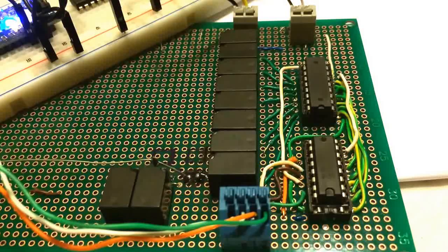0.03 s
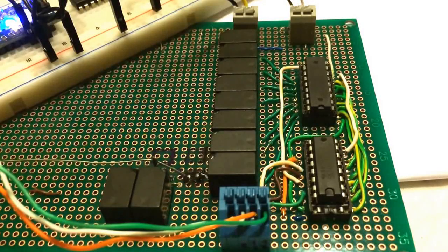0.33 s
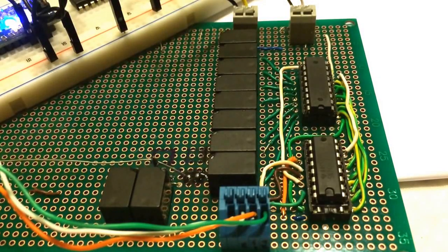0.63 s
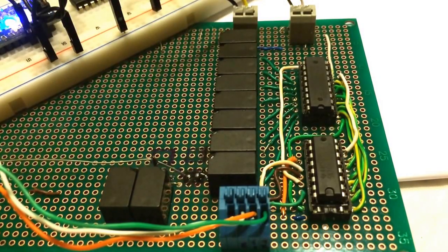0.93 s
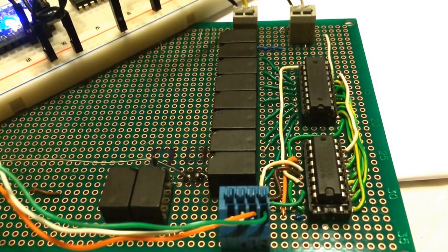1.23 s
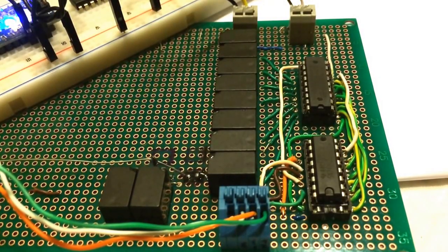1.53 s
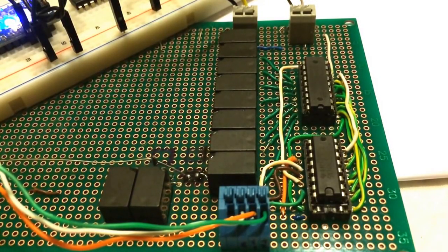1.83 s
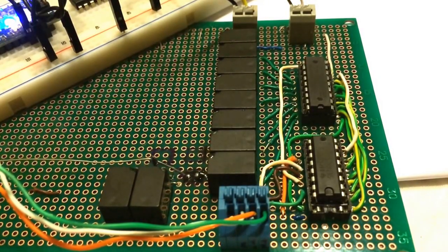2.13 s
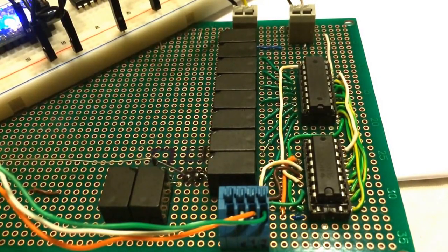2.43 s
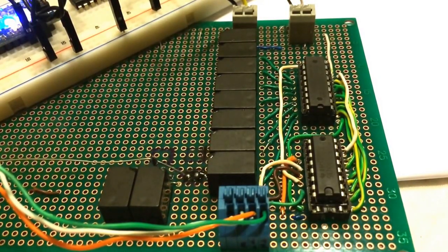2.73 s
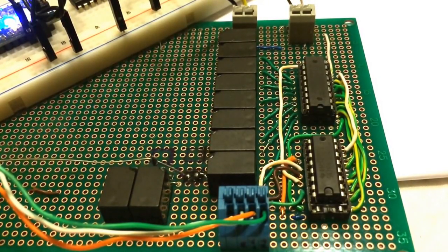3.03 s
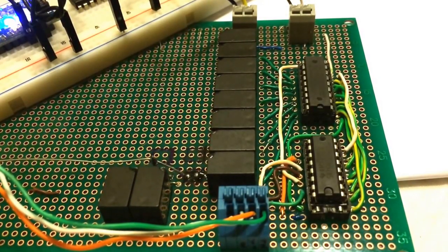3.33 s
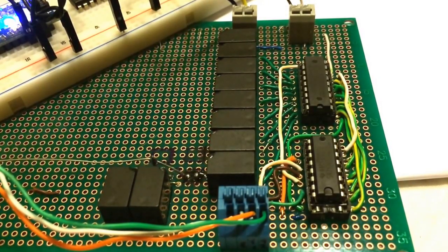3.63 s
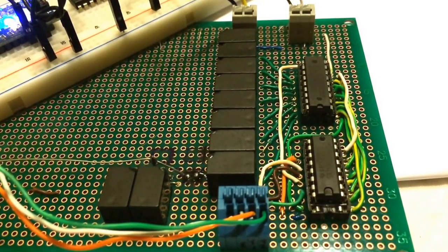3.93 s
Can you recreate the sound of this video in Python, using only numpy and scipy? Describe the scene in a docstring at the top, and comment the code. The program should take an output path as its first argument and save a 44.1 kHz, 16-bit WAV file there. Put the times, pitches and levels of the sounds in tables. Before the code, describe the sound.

A bank of small relays on a circuit board clicks rapidly and continuously, close to the microphone. Heavier clacks recur in a regular pattern within the bright chatter, like a tiny idling engine in a quiet small room.

```python
"""Relays counting in binary

Close to the microphone, seven small relays on a circuit board count at about fifty steps a second.
At each step any carrying relays drop out and rattle on their back stops; the next snaps in a few ms later.
The longer the carry, the heavier the clack and the more the board rings.
The desk reflects the clicks, and a quiet small room with a deep rumble lies behind."""
import sys
import numpy as np
from scipy import signal
from scipy.fft import rfft, irfft
from scipy.io import wavfile
from scipy.ndimage import uniform_filter1d

SR = 44100
rng = np.random.default_rng(int(sys.argv[2]) if len(sys.argv) > 2 else 0)


def pcm_store(signal):
    """Save signal as 16-bit PCM."""
    levels = np.round(np.clip(np.atleast_2d(signal), -1, 1) * 32767)
    wavfile.write(sys.argv[1], SR, levels.astype(np.int16).T)


N = 176400

STEP_S, ROLLOVER_S = .0202125, .4535  # at the rollover all seven relays drop out together
SAG_MS_PER_COIL = .125  # every other coil that is on loads the supply and slows the pull-in
TOUCH_LEAD_MS, TOUCH_DB = 1.6, -26  # the contact touches just before the armature lands
OPEN_LEAD_MS, OPEN_DB = .88, -31.5  # and opens just before the armature falls back
FASTEST_SNAP_T60_S, SNAP_T60_S, DROP_T60_S = .0038, .009, .006
BOARD_SNAP_DB, BOARD_DROP_DB = -2, -3.5
DESK_DB, DESK_T60_S, DESK_DELAY_S = -14.5, .0176, .002
ROOM_DB, ROOM_T60_S = -18, .18
AIR_DB, RUMBLE_DB = -61.5, -70


def relay_counter():
    """Each relay snaps in as its bit turns on and drops out as it turns off; both blows ring the board."""
    # The relays, lowest bit first. Each row: base pull-in delay in ms, snap level in dB, snap bounce
    # share, timing scatter in ms, drop-out delay in ms, drop level in dB, rebound gap in ms,
    # rebound share, push on the board in dB.
    relays = [(3.5, -7, 0.11, 0.039, .62, -14.5, .87, 0.82, -7.5),
              (3.6, -11, 0.44, .25, .45, -9.5, 2.2, 0.65, -3.5),
              (4.6, -15, 0.2, .2, 0.46, -9, 1.9, 0.91, 1), (5.2, -14, 0.7, 0.37, 0.3, -6, 1.3, 0.78, 4),
              (3.5, -9.5, 0.83, 0.17, 0.47, -6, 1.8, 0.9, 0.5), (2.8, -8, 0.56, 0.18, .5, -16.5, 1.7, 1, 2),
              (7.0, -6, 0.7, 0.18, .6, -1, 3.2, 0.9, 5.5)]
    # Impact spectra of the fastest relay, then of the rest. Each row: frequency in Hz, relative dB.
    fastest_snap_colour = [(400, -17), (1000, -27.5), (2500, -33.5), (3000, -19.5), (4100, -13.5),
                           (4500, -14.5), (5300, -8.5), (5850, -13.5), (6700, -3.5), (7200, -4.5),
                           (7800, -23), (8500, -15.5), (9300, -5), (9950, -1), (10500, -7), (11050, 2.5),
                           (11500, -5.5), (11900, -6), (12450, -3), (12950, -7), (13500, -16), (14350, -2),
                           (15000, -7), (16000, -15.5)]
    fastest_drop_colour = [(400, -12), (1500, -16), (2600, -18), (3000, -10), (4000, -23), (4500, -22.5),
                           (6000, -16.5), (6900, -6), (7500, -17.5), (8100, 1), (9000, -8.5), (9800, -4.5),
                           (10900, -5), (11700, -3.5), (12450, -5), (13000, -16), (13900, -24),
                           (15000, -19), (16000, -7)]
    snap_colour = [(400, -28.5), (1500, -16), (1900, -16.5), (2500, -27.5), (3700, -12), (4500, -18.5),
                   (6000, -9.5), (6900, -7), (7500, -4), (8200, -2.5), (9000, -9), (10000, -2.5),
                   (12400, -5), (13100, -8), (14000, -1.5), (15000, -7), (16000, -7)]
    drop_colour = [(400, -24), (900, -22), (1500, -9), (2000, -15), (2700, -18.5), (3700, -7), (4500, -21),
                   (5200, -10), (6700, -7.5), (7500, -13.5), (8350, 3.5), (9100, -5), (10500, -6.5),
                   (12300, -0.5), (13200, -4), (14900, 1), (16000, -21)]
    count = np.arange(-int(ROLLOVER_S / STEP_S), int((N / SR - ROLLOVER_S) / STEP_S) + 1)
    clock = ROLLOVER_S + count * STEP_S
    coils_on = sum((count >> bit) & 1 for bit in range(len(relays)))
    out = np.zeros(N)
    for bit, relay in enumerate(relays):
        pull_ms, snap_db, snap_share, scatter_ms, drop_ms, drop_db, gap_ms, drop_share, push_db = relay
        change = ((count >> bit) & 1) - (((count - 1) >> bit) & 1)
        late_ms = pull_ms + SAG_MS_PER_COIL * (coils_on - 1)
        late_ms += scatter_ms * rng.standard_normal(len(count))
        snaps = snap_in((clock + late_ms / 1000)[change > 0], snap_share)
        drops = drop_out(clock[change < 0] + drop_ms / 1000, gap_ms, drop_share)
        snap_t60 = SNAP_T60_S if bit else FASTEST_SNAP_T60_S
        out += undb(snap_db) * relay_body(snaps, snap_t60, snap_colour if bit else fastest_snap_colour)
        out += undb(drop_db) * relay_body(drops, DROP_T60_S, drop_colour if bit else fastest_drop_colour)
        blows = undb(BOARD_SNAP_DB) * snaps + undb(BOARD_DROP_DB) * drops
        out += undb(push_db) * through(blows, board_ring(bit))
    return out


def snap_in(times, share):
    """The coil pulls in: the contact touches and chatters, then the armature lands and bounces."""
    landing = bounces(times, gap_ms=1.15, share=share)
    chatter = bounces(times - TOUCH_LEAD_MS / 1000, gap_ms=.6, share=.36)
    return landing + undb(TOUCH_DB) * chatter


def drop_out(times, gap_ms, share):
    """The coil lets go: the contact opens, then the armature rattles on its back stop."""
    rattle = bounces(times, gap_ms, share)
    opening = bounces(times - OPEN_LEAD_MS / 1000, gap_ms, share=.44)
    return rattle + undb(OPEN_DB) * opening


def bounces(times, gap_ms, share, count=4, gap_scatter=.03, force_scatter_db=.98):
    """A part lands and rebounds at shrinking gaps, each blow about `share` times the one before."""
    chance = rng.standard_normal((len(times), 2, count))
    gaps = gap_ms / 1000 * (1 + gap_scatter * chance[:, 0]) * .85 ** np.arange(count)
    forces = unit(share ** np.arange(count)) * undb(force_scatter_db * chance[:, 1])
    hits = times[:, None] + np.cumsum(gaps, axis=1) - gaps
    return taps(hits.ravel(), forces.ravel())


def relay_body(blows, t60, spectrum):
    """Each blow sets the relay's small parts ringing for a few milliseconds."""
    return through(blows, unit(through(dense_ring(t60), colour(spectrum))))


def board_ring(bit, size=4096, rise_s=.00094):
    """The board struck at one relay's place; the blow takes a moment to spread through it."""
    # The board's modes. Each row: frequency in Hz, level in dB, t60 in seconds, place along the row
    # where it is struck best in relays, loss in dB per relay away from there.
    modes = [(584, -36, 0.036, 2, 1), (772, -24.5, 0.044, 4, 7.5), (894, -26, 0.019, 4.5, 6.5),
             (1115, -28.5, 0.024, .8, 5.5), (1469, -19.5, 0.018, 3, 5.5), (1631, -22, 0.027, 4, 4),
             (1781.4, -27, 0.033, 4.5, 1.1), (1849, -26, 0.022, 1.5, 0.5), (2002, -27, 0.022, 3.5, 1.5),
             (2903, -27, 0.033, 0, 7), (3253, -30, 0.022, 1.5, 4.5), (3730, -22, 0.021, 3.5, 3),
             (4031, -26.5, 0.064, .5, 5.5), (6800, -18, 0.014, 0, 3), (8470, -22.5, 0.012, -1, 5.5),
             (8590, -24.5, 0.011, 3.5, 0)]
    t = np.arange(size) / SR
    rise = 1 - np.exp(-t / rise_s)
    out = np.zeros(size)
    for hz, db, t60, place, loss_db in modes:
        mode = unit(np.sin(2 * np.pi * hz * t) * rise * fade(t60, size))
        out += undb(db - loss_db * abs(bit - place)) * mode
    return out


def desk_and_room(x, size=22050):
    """Quick reflections from the desk, then the faint tail of a small room."""
    # The tail's spectrum. Each row: frequency in Hz, relative level in dB.
    room_colour = [(200, 10), (1800, 8.5), (4500, 2), (7000, 3), (10000, -2.5), (16000, 2.5)]
    desk = np.concatenate([np.zeros(int(DESK_DELAY_S * SR)), dense_ring(DESK_T60_S)])
    decay = rng.standard_normal(size) * fade(ROOM_T60_S, size)
    tail = unit(through(decay, colour(room_colour)))
    return undb(DESK_DB) * through(x, desk) + undb(ROOM_DB) * through(x, tail)


def room_tone():
    """Steady room noise over a deep rumble that sinks and partly swells back."""
    # Spectra of the room noise and the rumble. Each row: frequency in Hz, relative level in dB.
    air_colour = [(20, -22), (60, -8.5), (90, 0), (130, -3.5), (195, 1), (260, -4), (400, -8), (700, -15),
                  (2000, -20), (16000, -27)]
    rumble_colour = [(15, -39), (28, -13), (45, -1.5), (80, -3.5), (130, -17.5), (400, -36), (16000, -87)]
    # The rumble's swell. Each row: time in seconds, relative level in dB.
    rumble_levels = [(0, 8), (.35, 4.5), (.6, 0), (1.7, -6), (3, 0.5), (4, -0.5)]
    swell_db = np.interp(np.arange(N) / SR, *np.array(rumble_levels).T)
    air = through(rng.standard_normal(N), colour(air_colour))
    rumble = through(rng.standard_normal(N), colour(rumble_colour))
    return undb(AIR_DB) * air + undb(RUMBLE_DB + swell_db) * rumble


def dense_ring(t60, size=2048, passes=6):
    """A ring of many modes: decaying noise, evened out so that it has no colour of its own."""
    envelope = fade(t60, size)
    x = rng.standard_normal(size) * envelope
    for _ in range(passes):
        spectrum = rfft(x)
        x = irfft(spectrum / (np.abs(spectrum) + 1e-12))
        power = uniform_filter1d(x ** 2, size=32).clip(1e-18)
        x = x * envelope / np.sqrt(power)
    return unit(x)


def colour(points, size=4096):
    """Minimum-phase response of unit energy, shaped by (Hz, dB) points."""
    hz, db = np.array(points, float).T
    bin_hz = np.maximum(np.arange(size // 2 + 1) * SR / size, 1)
    gains = undb(np.interp(np.log(bin_hz), np.log(hz), db))
    cepstrum = irfft(np.log(gains))
    cepstrum[1:size // 2] *= 2
    cepstrum[size // 2 + 1:] = 0
    return unit(irfft(np.exp(rfft(cepstrum))))


def taps(times, gains):
    """Impulses at the given times in seconds."""
    out = np.zeros(N)
    at = np.round(times * SR).astype(int)
    inside = (at >= 0) & (at < N)
    np.add.at(out, at[inside], gains[inside])
    return out


def fade(t60, size):
    """Exponential decay, 60 dB down after t60 seconds."""
    return np.exp(-np.log(1000) * np.arange(size) / SR / t60)


def through(x, response):
    """Pass a sound through an impulse response."""
    return signal.fftconvolve(x, response)[:N]


def unit(x):
    """Scale to an energy of one."""
    return x / np.sqrt(np.sum(x ** 2))


def undb(db):
    """Decibels to gain."""
    return 10 ** (np.asarray(db) / 20)


def scene():
    """The relays close up on one microphone, with the room behind."""
    bass_cut = signal.butter(2, 330, "high", fs=SR, output="sos")  # small parts radiate little bass
    relays = signal.sosfilt(bass_cut, relay_counter())
    return (relays + desk_and_room(relays) + room_tone())[None]


def record(dry):
    """The sound cuts in, reaches full level within a moment, and loses its top above 15.3 kHz."""
    start_s = .033
    opening = np.interp(np.arange(N) / SR, [start_s, start_s + .0014, start_s + .046], [0, .6, 1])
    top_cut = signal.ellip(8, .2, 60, 15300, fs=SR, output="sos")
    return signal.sosfilt(top_cut, dry * opening)


dry = scene()
out = record(dry)
pcm_store(out)
```